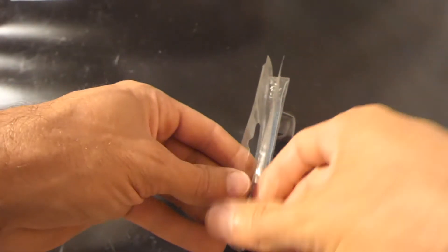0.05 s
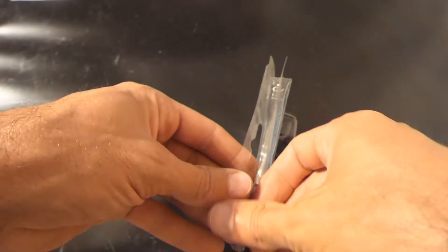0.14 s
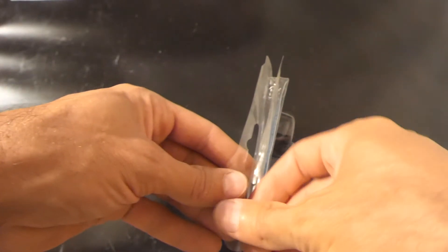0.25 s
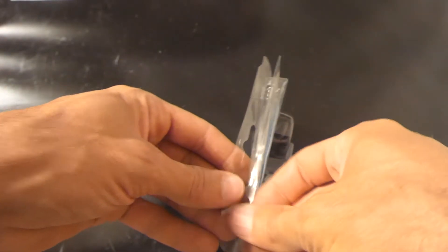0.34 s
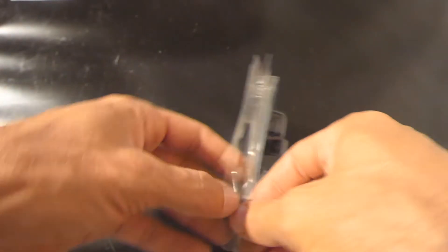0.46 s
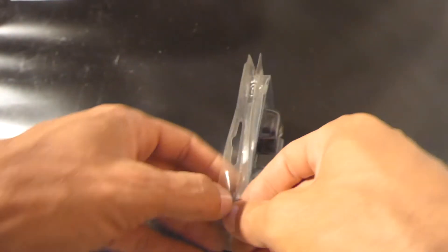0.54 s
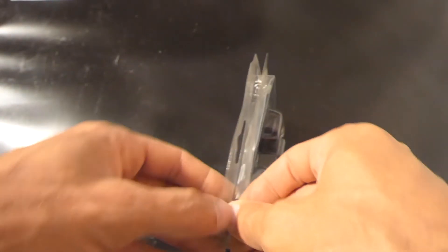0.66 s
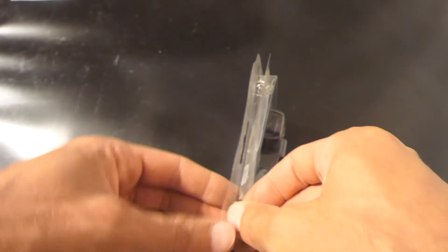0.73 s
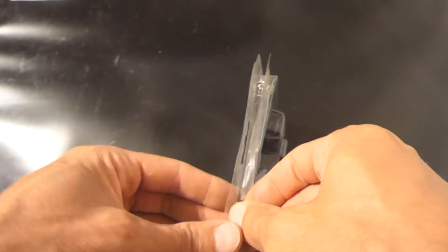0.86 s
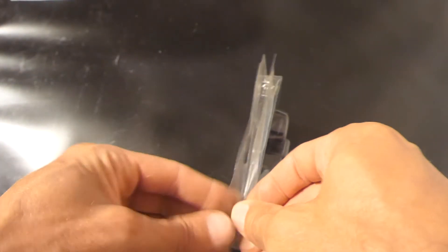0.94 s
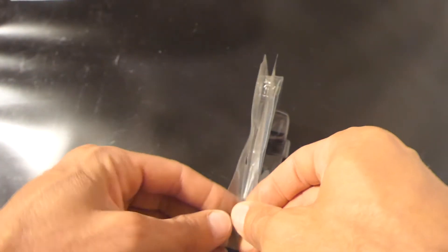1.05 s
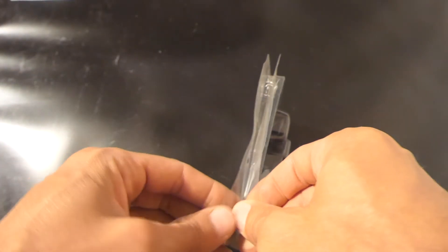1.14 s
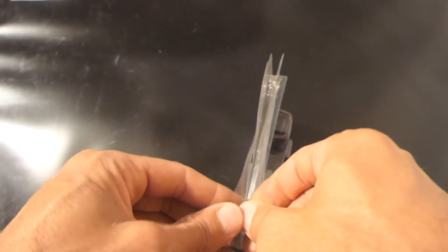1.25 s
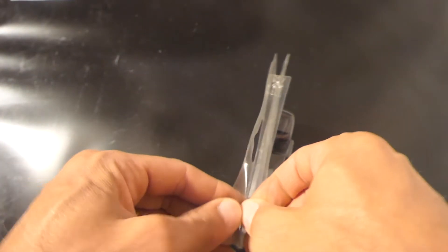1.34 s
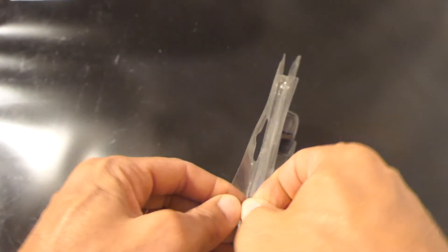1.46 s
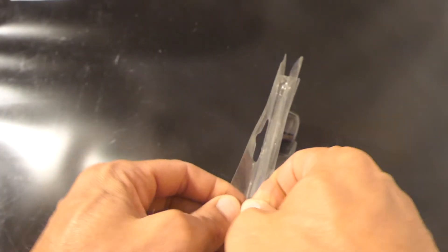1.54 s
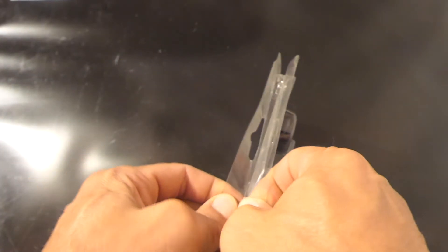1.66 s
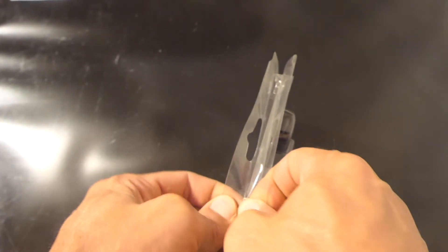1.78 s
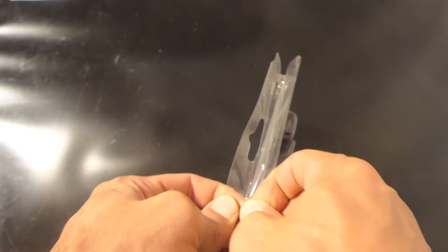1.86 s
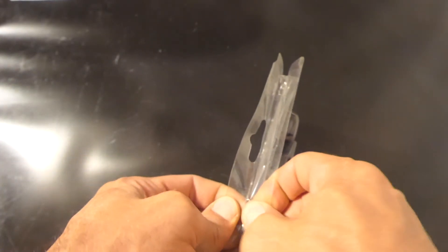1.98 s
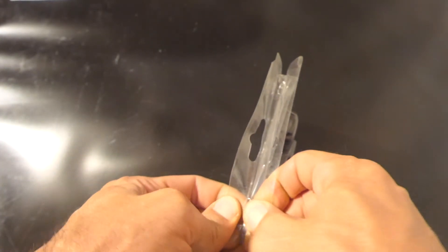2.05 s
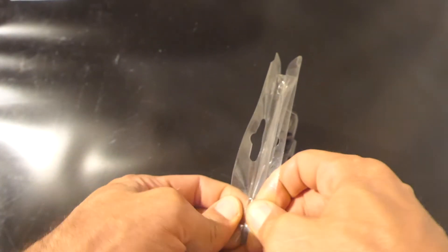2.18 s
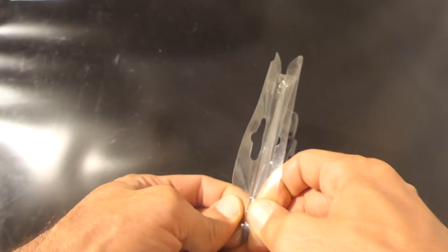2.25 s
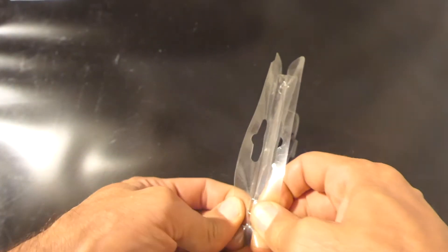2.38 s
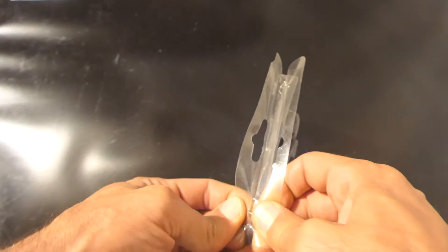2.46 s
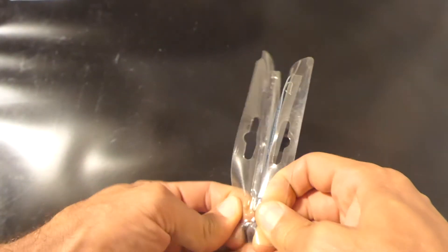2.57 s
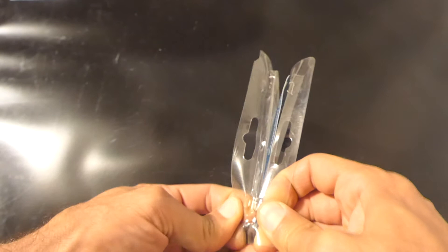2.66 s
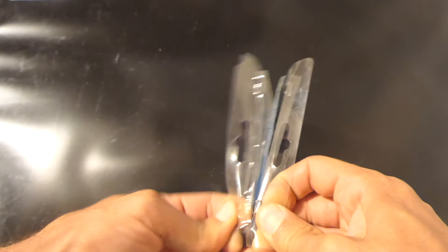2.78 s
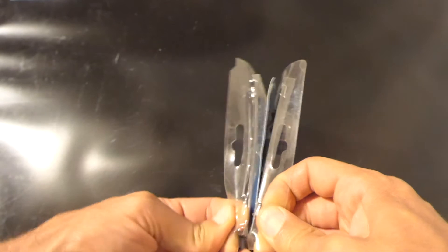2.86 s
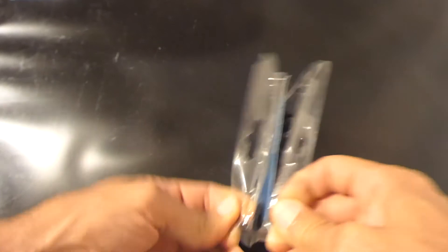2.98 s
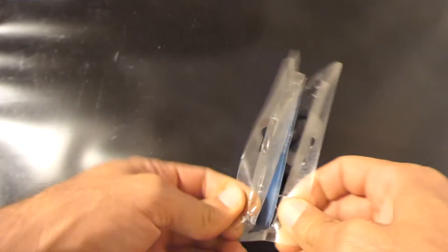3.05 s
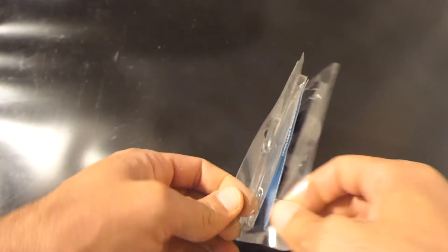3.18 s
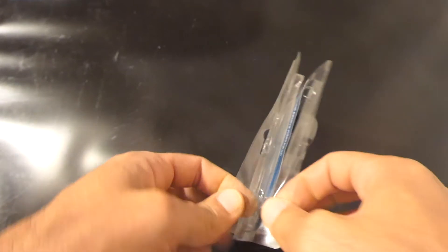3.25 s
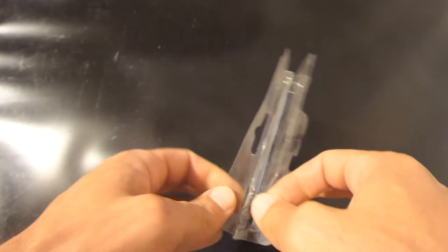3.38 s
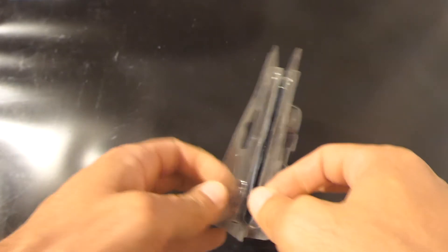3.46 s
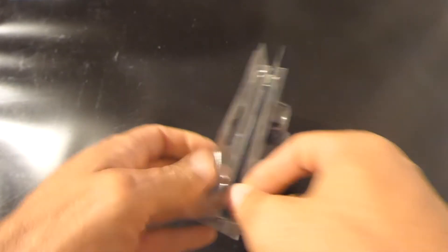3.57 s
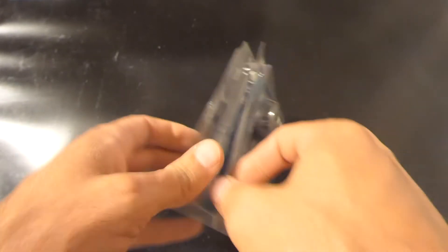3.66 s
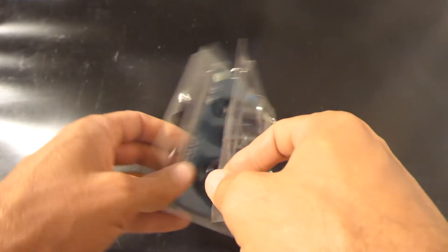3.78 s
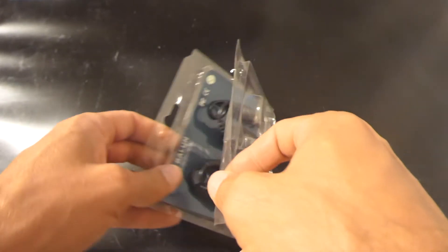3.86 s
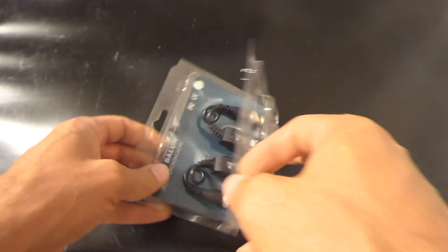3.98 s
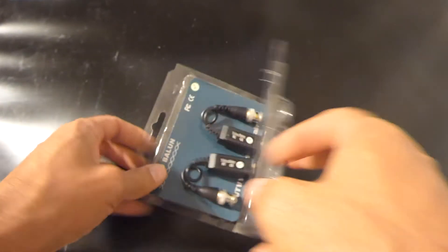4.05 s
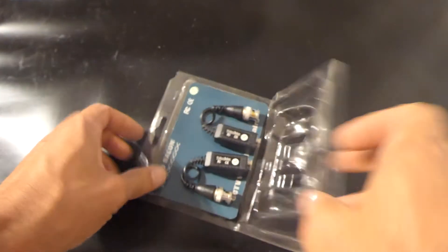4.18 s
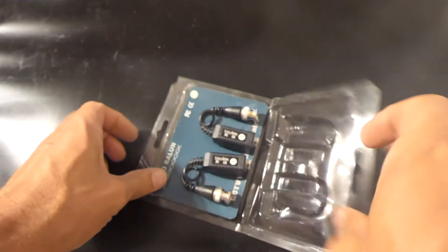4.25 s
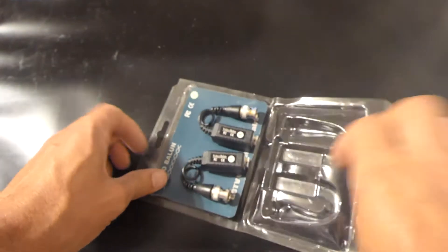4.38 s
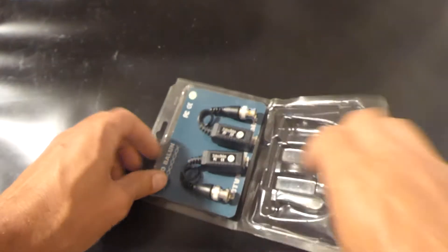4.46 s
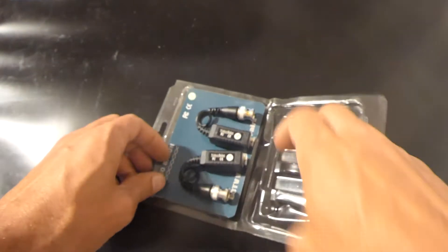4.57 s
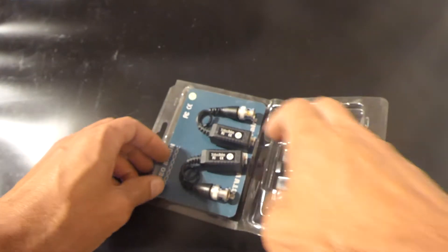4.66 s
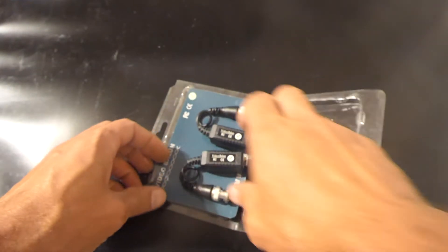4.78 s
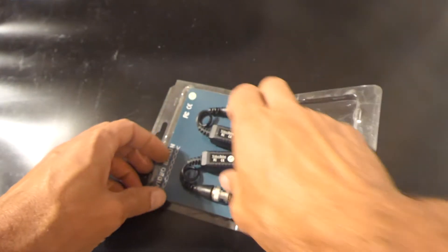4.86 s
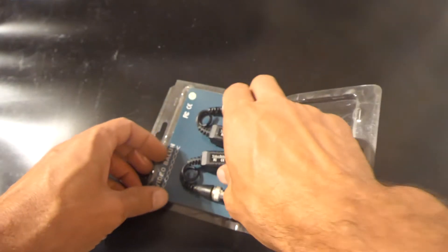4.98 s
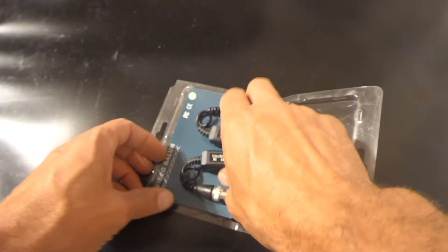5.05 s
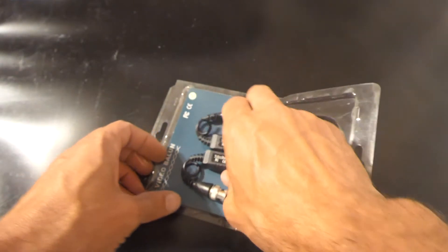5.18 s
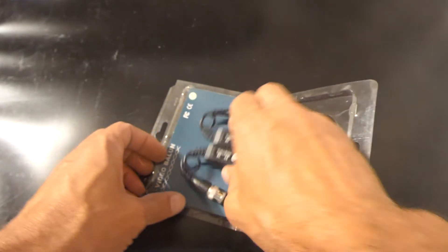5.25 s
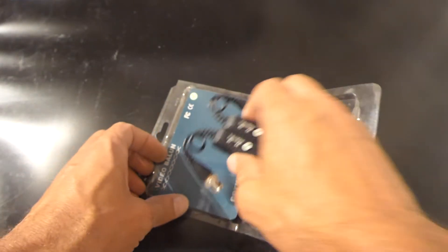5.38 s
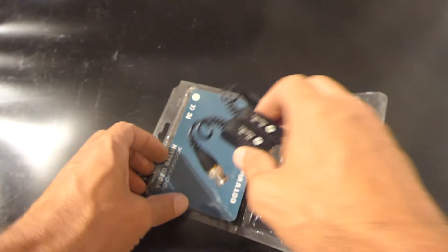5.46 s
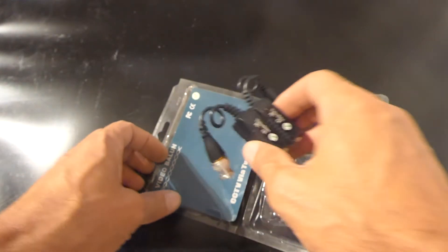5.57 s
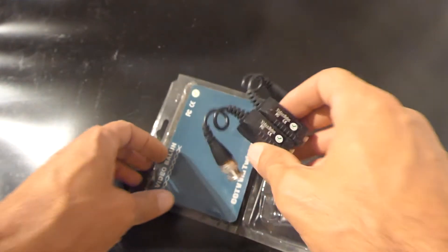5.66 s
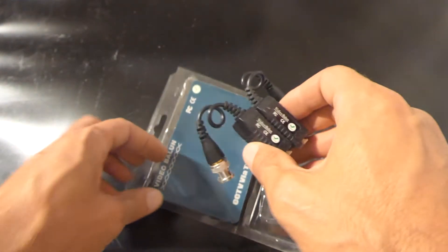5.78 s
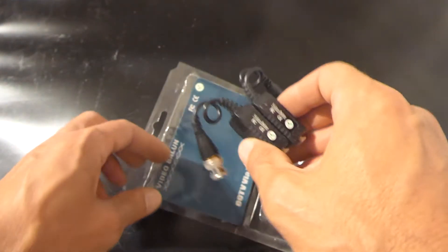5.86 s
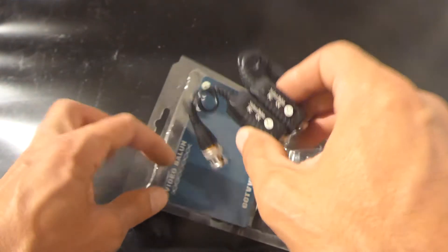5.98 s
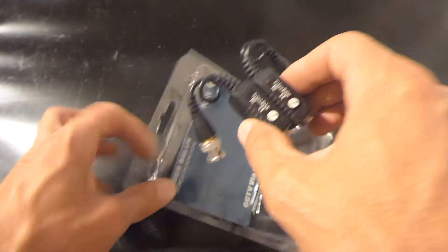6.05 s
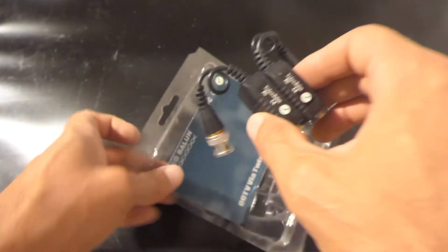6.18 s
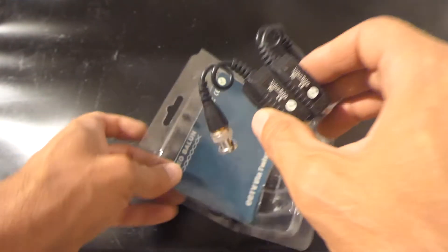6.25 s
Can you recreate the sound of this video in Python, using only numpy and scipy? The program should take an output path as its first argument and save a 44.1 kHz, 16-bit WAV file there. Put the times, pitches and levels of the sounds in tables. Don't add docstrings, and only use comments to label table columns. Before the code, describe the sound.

Fingers fumble and pick at a stiff plastic blister pack, then sharp weld snaps burst out, the lid buckles open, and parts click loose.

```python
import sys
import numpy as np
from scipy import signal
from scipy.fft import rfft, irfft, next_fast_len
from scipy.io import wavfile
from scipy.ndimage import uniform_filter1d, map_coordinates

SR = 44100
rng = np.random.default_rng(int(sys.argv[2]) if len(sys.argv) > 2 else 0)


def decibels_to_gain(level_db):
    exponent = np.asarray(level_db, float) / 20
    return 10 ** exponent


def log_audio(samples):
    frames = np.atleast_2d(samples).T
    limited = np.clip(frames, -1, 1)
    pcm = np.round(limited * 32767).astype(np.int16)
    wavfile.write(sys.argv[1], SR, pcm)


N = 278712

# time_s, left_minus_right_db
PACK_PAN = [(0, -2), (1.9, -3), (3.45, -2.5), (3.7, -0.6), (5.4, -1.8), (6.32, -0.5)]
# freq_hz, level_db
SKIN_COLOUR = [(880, -22.5), (1500, -2.5), (2600, -9), (2820, -6), (3060, -8), (3310, -9), (3550, -6.5),
               (10200, -11), (14900, -28), (16500, -52.5)]
# freq_hz, width_hz, level_db
TABLE_MODES = [(86.3, 72, -8), (149, 12, 1), (178.2, 18.8, 1), (234.7, 73, -1), (380, 45.6, -1.5),
               (676, 56, -5.5)]
# freq_hz, level_db
EDGE_FIZZ = [(5000, 8.5), (6800, -4.5), (9500, -1), (12000, -14.5), (15000, -36), (17000, -31.5)]
# delay_s, level_db
REFLECTIONS = [(.0035, -9.5), (.0056, -27.5), (.0095, -22), (0.0116, -20.5), (0.027, -26)]
# freq_hz, t60_s
ROOM_DECAY = [(150, 0.28), (400, 0.29), (1000, 0.28), (2800, 0.22), (7000, 0.27), (14000, 0.2)]
# freq_hz, level_db
ROOM_TONE = [(15, -32.5), (25, -11), (87, -13), (238, -4), (470, -5.5), (600, -4), (1090, -4), (1250, -4),
             (2040, -17.5), (8140, -27.5), (10100, -18.5), (15400, -28), (16500, -48)]
# freq_hz, likeness
EAR_LIKENESS = [(60, -2), (180, -5), (550, 0.37), (1650, 0.6), (4970, 0.74), (15000, 1)]
# freq_hz, width_hz, level_db
SHUT_SHELL = [(778, 69, 3), (1208, 187, -0.5), (1588, 1550, -10.5), (2250, 153, -3), (2900, 1500, -20.5)]
# freq_hz, width_hz, level_db
OPEN_SHELL = [(823, 145, -4.5), (1250, 370, -6.5), (1640, 250, -3), (2200, 200, -6.5), (2790, 560, -11)]
# freq_hz, level_db
MIC_COLOUR = [(27, -10.5), (58, -3), (150, -3), (4500, -1.5), (6600, 0), (9500, -2.5), (13000, 0.5),
              (15000, -2.5), (16500, -20)]
# start_s, peak_db, crack_hz, drum_db, knock_db
SHELL_SHOVES = [(0.041, -42.5, 3200, -8, -8.5), (0.3288, -59, 2200, 8, -13), (1.1431, -40, 2200, 2.5, -1.5),
                (1.677, -56, 2470, 1, 2.5), (3.3344, -40, 2490, 0, -1), (3.7446, -36, 2230, -20, -16),
                (3.825, -32.5, 2400, -10, -39), (3.9058, -36, 3130, 2.5, -10),
                (4.1975, -26.5, 4230, -4, -15.5), (4.2034, -28, 2270, 0, -16), (4.543, -37.5, 4900, 1, 0),
                (4.5604, -33.5, 4000, 2.5, -10), (4.601, -32.5, 3570, -1.5, -10.5),
                (5.484, -63.5, 3650, 4, -25.5), (5.673, -62, 2350, 10, -22), (5.9632, -38.5, 2440, 0, -42),
                (5.976, -30.5, 4900, -0.5, -42), (6.01, -36.5, 3250, 0, -38), (6.102, -36, 4500, -10, -19)]
# start_s, end_s, slips_per_s, peak_db, pitch_hz
SEAM_CREAK = (1.34, 1.7, 60, -56, 5100)
# start_s, peak_db, crack_hz, fizz_db, drum_db
SEAM_PICKS = [(.0946, -47.5, 3520, -5, -8), (.1422, -48, 2170, 0, -9), (.3115, -53, 2260, 5, -4),
              (.5935, -56, 2260, 5, 2.5), (.6908, -57.5, 5700, -9, 1), (1.063, -45.5, 2250, 3, -6.5),
              (1.1315, -54, 5000, 9, -9), (1.361, -47.5, 5340, -6.5, -5), (1.7886, -55, 2260, 5, 3.5),
              (2.085, -47.5, 2400, -5, -2), (1.941, -44.5, 2900, -46, -2), (1.9733, -20.5, 2840, -13, -15),
              (1.9768, -23.5, 2360, -11, -9.5), (2.164, -40.5, 4400, -28, -4),
              (2.231, -41.5, 4300, -16, -2.5), (2.2758, -33.5, 5160, -3, -16)]
# start_s, peak_db, crack_hz, fizz_db, drum_db
WELD_SNAPS = [(2.5478, -38, 5740, -12, -12), (2.5577, -15, 4500, -5, -18), (2.5584, -11, 3000, -33.5, -16),
              (2.5584, -20, 7900, -15, -10), (2.7463, -25, 2250, -13, -10), (2.7655, -22.5, 3100, -14, -31),
              (2.8625, -35.5, 8200, -4, -22), (2.8735, -32, 3700, -20, -12), (2.9283, -32, 4400, -10, -15),
              (3.033, -23.5, 3120, -10.5, -15), (3.0483, -1.5, 3930, -29, -30),
              (3.0488, -8.5, 2180, -36.5, -41), (3.1443, -30.5, 2210, -31, -16),
              (3.174, -36, 2200, -14, -7.5), (3.213, -18, 3900, -14.5, -24.5),
              (3.2883, -30, 3120, -13, -12.5), (3.4036, -23.5, 4000, -14, -18.5),
              (3.5271, -37, 2250, -13, -10), (3.575, -34.5, 2350, -26, -10.5)]
# start_s, peak_db, crack_hz, fizz_db, drum_db
LID_BUCKLES = [(3.7635, -38, 2400, 1, -19), (3.8285, -34.5, 4220, 6, -12), (3.8419, -41, 3050, 2, -7),
               (4.3367, -27, 4900, -11, -10), (4.5007, -31.5, 3860, -7, -9),
               (4.9769, -55.5, 2260, -38.5, 9.5), (5.0442, -55, 2200, -8, 3.5),
               (5.116, -29, 3250, -7.5, -6.5), (5.1614, -34.5, 2190, 10, -2), (5.1614, -24, 3680, -7, -33),
               (6.0259, -28, 3300, -28, -15), (6.0562, -35.5, 4900, -13, -6), (6.219, -38, 2280, -13, -3),
               (6.232, -36.5, 2330, -16, 5), (6.2358, -18.5, 4900, -8.5, -15),
               (6.2378, -19.5, 3200, -21, -8.5), (6.25, -31, 3000, -2, -4)]
# start_s, peak_db, crack_hz, fizz_db, drum_db
FOLD_TICKS = [
    (4.5628, -30.5, 3700, -5, -20),
    (4.5445, -37, 3900, -14, -20),
    (4.2, -37, 4200, -10, -13),
    (4.6605, -52, 6000, 2, -18),
]
# start_s, peak_db, crack_hz, drum_db, knock_db
EDGE_TAPS = [(0.353, -45, 5000, -12, -24), (2.5587, -32.5, 4300, -21, 1), (3.3235, -38, 2480, -12, -9),
             (3.7215, -33.5, 4100, -11, -18), (3.77, -37, 2790, -14, -18), (3.8145, -25, 2670, -4, -14),
             (4.3055, -54, 2250, 13, 3.5), (4.4866, -50, 2250, 13, 4.5), (4.659, -48, 2440, 7, -3),
             (6.1228, -38, 4800, -12, -6), (6.2355, -36.5, 4800, -14, -2)]
# peak_s, rub_db, drum_db, swell_s, fade_s
SHUT_STROKES = [(.06, -59.5, -52.5, 0.15, 0.086), (.16, -62, -61, .1, 0.08),
                (.35, -57, -56.5, 0.059, 0.085), (.47, -60, -64, 0.19, 0.13), (.61, -56, -55.5, 0.051, 0.1),
                (.74, -55, -62, 0.06, 0.066), (.98, -54, -65, 0.051, 0.054), (1.08, -53, -58, 0.017, 0.019),
                (1.33, -64, -54.5, 0.057, 0.033), (1.47, -70.5, -58.5, 0.21, 0.54),
                (1.69, -64.5, -50.5, 0.068, 0.14), (1.81, -63, -56, 0.063, 0.055),
                (2.17, -64.5, -52, 0.27, 0.11), (3.02, -49, -48.5, 0.38, 0.22),
                (3.33, -52, -47, 0.13, 0.13), (3.58, -53, -53.5, 0.1, 0.055)]
# peak_s, rub_db, drum_db, swell_s, fade_s
OPEN_STROKES = [(3.759, -45, -41.5, 0.061, 0.27), (3.87, -63, -67, .1, 0.17),
                (4.17, -50, -52.5, 0.51, 0.28), (4.36, -67, -49.5, 0.16, 0.16),
                (4.511, -46, -40.5, 0.05, 0.12), (4.57, -42.5, -52, 0.062, .14),
                (4.75, -58.5, -52, 0.19, 0.28), (5.401, -53.5, -51, 0.34, 0.23),
                (5.49, -72, -50, 0.12, 0.068), (5.67, -60, -57, 0.16, 0.3), (5.8, -57, -51, 0.2, 0.36),
                (5.98, -42.5, -45.5, 0.096, 0.1), (6.11, -47, -42.5, 0.081, 0.076),
                (6.18, -63, -46, 0.15, 0.45)]
# peak_s, rub_db, drum_db, fade_s
SHEET_SETTLING = [(1.155, -54, -45, 0.12), (2.002, -47.5, -61, 0.062), (2.29, -59, -49.5, 0.1),
                  (2.592, -37.5, -44.5, 0.094), (2.768, -48, -51, 0.15), (3.099, -46.5, -52, 0.1),
                  (3.419, -54, -54, 0.13), (4.217, -36.5, -28.5, 0.043), (5.13, -49, -60.5, 0.067),
                  (5.18, -47.5, -63, 0.078), (6.249, -42, -46, 0.065)]
# peak_s, rumble_db, swell_s, fade_s
TABLE_DRAGS = [(.05, -55, 0.084, 0.15), (.35, -58.5, 0.049, 0.24), (1.18, -45, 0.044, 0.08),
               (1.34, -57.5, 0.12, .25), (1.71, -58, 0.41, 0.17), (1.99, -63, .1, 0.64),
               (2.6, -36, 0.048, 0.053), (2.65, -54.5, .05, 0.44), (3.03, -47.5, 0.38, 0.15),
               (3.17, -52, 0.14, 0.13), (3.34, -51, 0.13, 0.036), (3.59, -57.5, 0.28, 0.08),
               (3.73, -56, 0.042, .09), (3.82, -52, 0.045, 0.09), (3.91, -48, .04, 0.094),
               (4.29, -49.5, 0.3, 0.17), (4.58, -49.5, 0.16, 0.35), (5.17, -59, 0.23, 0.98),
               (6.13, -55, 0.32, 0.34), (6.25, -43.5, 0.064, 0.12)]
# start_s, peak_db
HUM_KNOCKS = [
    (.33, -58.5),
    (1.143, -53),
    (1.329, -68),
    (4.487, -50.5),
]
# start_s, peak_db, pitch_hz, t60_s
SHUT_POPS = [(.043, -41.5, 767, 0.1), (.1425, -51, 2200, 0.033), (.312, -54, 2200, 0.033),
             (.327, -50, 853, 0.047), (.335, -52, 402.4, 0.19), (2.017, -42, 2780, .02),
             (3.2162, -26, 3900, .008), (2.9315, -34, 4500, .008), (2.425, -55, 4030, .004),
             (2.515, -57.5, 3200, .006), (2.5585, -21.5, 1186, 0.014), (2.5625, -12.5, 4560, 0.01),
             (2.564, -20.5, 2245, 0.017), (2.572, -17, 10800, .004), (2.5722, -22, 7800, .004),
             (2.5915, -27, 4240, .02), (2.6145, -33, 4220, 0.025), (2.7497, -32, 2280, .025),
             (2.874, -41, 3710, 0.083), (2.971, -38.5, 2300, 0.02), (3.172, -31.5, 1670, 0.024),
             (3.146, -45, 1390, .02), (3.05, -25.5, 1600, .025), (.596, -57, 823, .12),
             (3.05, -30.5, 1280, 0.036), (1.066, -50, 2200, .02), (1.067, -58, 910, .06),
             (1.133, -49, 6400, .025), (1.139, -44, 2200, .03), (1.1455, -37, 817, 0.053),
             (1.153, -39, 2110, 0.023), (1.999, -40, 3030, .03), (3.0328, -31, 6700, .006),
             (3.053, -23, 1896, 0.026), (3.064, -31, 5000, 0.018), (2.5581, -10, 4370, .012),
             (2.5577, -12, 9300, .009), (2.5577, -18, 11500, .006), (3.0484, -21, 5700, .006),
             (3.0516, -32, 9700, .008), (3.0365, -29, 2700, .01), (1.15, -48, 300, 0.22),
             (1.33, -60, 298, .2)]
# start_s, peak_db, pitch_hz, t60_s
OPEN_POPS = [(3.717, -48.5, 796, .08), (3.724, -45, 353, 0.15), (3.741, -38, 1640, 0.025),
             (3.749, -33.5, 1640, 0.03), (3.762, -36, 2030, 0.026), (3.772, -36, 1600, .025),
             (3.8148, -18.5, 1480, 0.005), (3.815, -32, 2820, .01), (3.8253, -24, 1640, 0.026),
             (3.844, -42, 1600, 0.034), (3.861, -45, 1630, 0.028), (3.901, -44, 1740, 0.019),
             (3.9058, -27.5, 1600, 0.03), (3.908, -34.5, 3280, .02), (3.91, -41, 282, 0.041),
             (4.634, -41, 1600, 0.025), (4.491, -49.5, 110, .2), (4.501, -34, 1657, 0.045),
             (4.513, -38, 1760, 0.028), (4.522, -41, 1630, 0.027), (4.536, -42, 1600, .02),
             (4.5463, -34, 1640, .018), (4.5538, -32, 1940, .02), (4.5634, -23.5, 1750, 0.009),
             (4.5728, -36, 1770, .03), (4.587, -34, 1920, 0.014), (4.605, -27.5, 1350, 0.021),
             (4.611, -32.5, 1980, .02), (4.6589, -36.5, 1650, 0.018), (5.1137, -37, 3500, .006),
             (5.1162, -39, 1115, .015), (5.1609, -31, 980, 0.014), (5.162, -32.5, 1980, 0.011),
             (4.1964, -26, 1780, 0.018), (4.2, -24, 1250, .02), (4.203, -23.5, 1354, 0.022),
             (4.2066, -24, 2030, .012), (4.213, -27, 2310, .03), (4.228, -30, 1600, 0.017),
             (4.2002, -23, 3200, .008), (4.2003, -27, 5000, .006), (4.3054, -37.5, 1100, 0.01),
             (3.9117, -28.5, 1640, 0.026)]
# start_s, peak_db, pitch_hz, t60_s
TRAY_POPS = [(5.3226, -50, 2000, .03), (5.329, -55, 1420, 0.056), (5.3694, -48, 1476, .07),
             (5.405, -52, 3270, .05), (5.447, -47, 1660, .025), (5.484, -44.5, 1557, 0.051),
             (5.6428, -50, 1670, 0.057), (5.6736, -42.5, 1620, .04), (5.7072, -49, 1600, .05),
             (5.7403, -47, 1620, .05), (5.7, -57, 2790, .3), (5.785, -54, 2770, .08),
             (5.775, -48, 1620, .15), (5.826, -45, 1440, 0.022), (5.875, -51, 2400, 0.19),
             (5.89, -49, 1600, .05), (5.92, -50, 2780, .08), (5.949, -63, 110, .2), (6.08, -52, 130, .2),
             (6.241, -54, 99, 0.16), (5.9776, -26.5, 5380, 0.007), (6.013, -35, 1570, 0.032),
             (6.109, -37, 1400, 0.017), (6.126, -41, 4970, 0.014), (6.242, -27, 1554, 0.016),
             (6.2883, -40, 3150, 0.018), (6.2972, -41, 3150, .025), (6.29, -44, 1600, 0.014),
             (6.2358, -18, 4950, .016), (6.237, -21, 3130, 0.017), (6.2377, -24.5, 6300, .012)]

LOOSE_S, OPENS_S = 1.9, 3.65
ROOM_TONE_DB = -64
REST_RUB_DB, REST_DRUM_DB, REST_RUMBLE_DB = -81, -69.5, -69.5
BRIGHT_DB, DULL_DB = 2.5, -2
SETTLE_SWELL_S = 0.041
SHOVE_RISE_S, SHOVE_FIZZ_DB, TAP_FIZZ_DB = 0.00319, -11.5, -7
KNOCK_DB, KNOCK_SLOPE = -51, -0.041
POP_RISE_CYCLES, POP_ROUGH, POP_ROOM_DB, POP_SPREAD_S = 1.46, 0.46, -10, 0.0074
HUM_HZ, HUM_T60_S = 140.2, 0.64


def unit(x):
    return x / np.sqrt(np.mean(x ** 2) + 1e-20)


def along(points, hz):
    f, v = np.transpose(points)
    return np.interp(np.log(hz + 1), np.log(f + 1), v)


def pack_pan():
    s, balance_db = np.transpose(PACK_PAN)
    pan_db = np.interp(np.arange(N) / SR, s, balance_db)
    return decibels_to_gain(pan_db * np.array([[.5], [-.5]]))


def wobble(rate):
    knots = rng.standard_normal(int(N * rate / SR) + 4)
    return map_coordinates(knots, [np.arange(N) * rate / SR])


def filtered(x, response):
    n = x.shape[-1]
    m = next_fast_len(n + 4096)
    return irfft(rfft(x, m) * response(np.fft.rfftfreq(m, 1 / SR)), m)[..., :n]


def modes(table):
    def response(f):
        total = 0
        for k, (centre, width, db) in enumerate(table):
            damping = 1j * f * width
            total = total + (-1) ** k * decibels_to_gain(db) * damping / (centre * centre - f * f + damping)
        return total

    return response


def ear_likeness(hz):
    return along(EAR_LIKENESS, hz)


def stereo_noise(colour, alike, patchy_db):
    z = signal.stft(rng.standard_normal((2, N)), nperseg=512)[2]
    field = uniform_filter1d(rng.standard_normal(z.shape[1:]), size=3, axis=0)
    field = uniform_filter1d(field, size=9, axis=1)
    noise = signal.istft(z * decibels_to_gain(patchy_db * unit(field)), nperseg=512)[1][:, :N]

    def mid_side(hz):
        turn = np.arccos(np.clip(alike(hz), -1, 1)) / 2
        return colour(hz) * np.array([np.cos(turn), np.sin(turn)])

    mid, side = filtered(noise, mid_side)
    return unit(np.array([mid + side, mid - side]))


def room_tail():
    n = SR // 4
    hz, t, z = signal.stft(rng.standard_normal((2, n)), SR, nperseg=256)
    decay = decibels_to_gain(-60 * t / along(ROOM_DECAY, hz)[:, None])
    tail = signal.istft(z * decay, SR, nperseg=256)[1][:, :n]
    tail = tail * (1 - np.exp(-np.arange(n) / SR / 0.001))
    mid, side = tail / np.linalg.norm(tail[0])
    return np.array([mid + 0.5 * side, mid - 0.45 * side])


def room_tone():
    colour = lambda hz: decibels_to_gain(along(ROOM_TONE, hz))
    return decibels_to_gain(ROOM_TONE_DB - 0.5) * stereo_noise(colour, lambda hz: 0.063 + 0 * hz, patchy_db=2.5)


def strokes(rows, rest_db):
    t, power = np.arange(N) / SR, decibels_to_gain(2 * rest_db)
    for s, db, swell, fade in rows:
        drop_db = 20 * np.maximum((s - t) / swell, (t - s) / fade)
        power = power + decibels_to_gain(2 * (db - drop_db))
    return np.sqrt(power)


def micro_slips(rate, spread_db):
    size = np.minimum(rng.exponential(size=N), 3)
    return (rng.random(N) < rate / SR) * rng.choice([-1, 1], N) * decibels_to_gain(spread_db * size)


def rubbing(tilt_db):
    skin = lambda hz: decibels_to_gain(along(SKIN_COLOUR, hz) + tilt_db * np.log2((hz + 1) / 5000))
    slips = unit(filtered(micro_slips(640, 5), skin))
    grip = decibels_to_gain(1.9 * wobble(70))
    return unit(grip * stereo_noise(skin, ear_likeness, patchy_db=2.0) + 0.45 * slips)


def drumming(shell):
    lumps = unit(filtered(micro_slips(350, 4.8), modes(shell)))
    press = decibels_to_gain(2.5 * wobble(45))
    return unit(press * stereo_noise(modes(shell), ear_likeness, patchy_db=4.5) + 0.78 * lumps)


def dragging():
    table = lambda hz: modes(TABLE_MODES)(hz) * modes([(260, 600, 0)])(hz)
    rumble = stereo_noise(table, lambda hz: .65 + 0 * hz, patchy_db=3)
    return decibels_to_gain(-4.0) * strokes(TABLE_DRAGS, REST_RUMBLE_DB) * rumble


def hands():
    settling = [(s, rub, drum, SETTLE_SWELL_S, fade) for s, rub, drum, fade in SHEET_SETTLING]
    moves = [*SHUT_STROKES, *OPEN_STROKES, *settling]
    sliding = strokes([(s, rub, *shape) for s, rub, drum, *shape in moves], REST_RUB_DB)
    bending = strokes([(s, drum, *shape) for s, rub, drum, *shape in moves], REST_DRUM_DB)
    t = np.arange(N)
    rub = np.where(t < LOOSE_S * SR, rubbing(BRIGHT_DB), rubbing(DULL_DB))
    drum = np.where(t < OPENS_S * SR, drumming(SHUT_SHELL), drumming(OPEN_SHELL))
    touch = decibels_to_gain(3.0) * sliding * rub + decibels_to_gain(-3.5) * bending * drum
    return pack_pan() * touch + dragging()


def snap(s, rise, hz, fizz_db, drum_db, knock_db):
    t = np.arange(SR // 8) / SR

    def ring(t60, rough, *bodies):
        jolt = np.double(t == 0)
        fractures = rng.standard_normal(len(t)) * decibels_to_gain(-60 * t / (t60 + 6 * rise))
        if rise:
            direct = fractures * (t / rise).clip(0, 1) ** 2
        else:
            direct = jolt + rough * fractures
        both = np.array([direct, jolt])
        for body in bodies:
            both = filtered(both, body)
        both[1] *= np.linalg.norm(both[0]) / np.linalg.norm(both[1])
        return both / np.max(np.abs(both[0]))

    fold = [(.66 * hz, .25 * hz, -13), (hz, .22 * hz, 0), (1.38 * hz, .4 * hz, -8)]
    crack = ring(0.013, 0.12, modes(fold), modes([(hz, 3.7 * hz, 0)]), modes([(hz, 5.0 * hz, 0)]))
    flaps = [(hz * decibels_to_gain(db), 90, 0) for db in np.sort([0, *rng.normal(0, 2.5, 3)])]
    crack += decibels_to_gain(-17) * ring(.003, 0.15, modes(flaps), modes([(hz, 1.2 * hz, 0)]))
    fizz = ring(0.0065, 0.71, modes([(10100, 5500, 0)]), lambda f: decibels_to_gain(along(EDGE_FIZZ, f)))
    shell = SHUT_SHELL if s < OPENS_S else OPEN_SHELL
    shell = [(c * decibels_to_gain(rng.normal(0, 0.44)), w, db + rng.normal(0, 1.9)) for c, w, db in shell]
    drum = ring(0.012, 1.0, modes(shell), modes([(1600, 1500, 0)]))
    knock = ring(0.075, 0.38, modes(TABLE_MODES), modes([(290, 390, 0)]), modes([(299, 1100, 0)]))
    sheet = crack + decibels_to_gain(fizz_db + 10.0) * fizz
    return sheet + decibels_to_gain(drum_db + 4.5) * drum + decibels_to_gain(knock_db - 0.4) * knock


def snap_rows():
    rows = []
    for row in [*SEAM_PICKS, *WELD_SNAPS, *LID_BUCKLES]:
        rows.append((0, *row, KNOCK_DB + KNOCK_SLOPE * row[1]))
    rows += [(0, *row) for row in creak()]
    rows += [(0, s, db, hz, TAP_FIZZ_DB, *body) for s, db, hz, *body in EDGE_TAPS]
    rows += [(SHOVE_RISE_S, s, db, hz, SHOVE_FIZZ_DB, *body) for s, db, hz, *body in SHELL_SHOVES]
    rows += [(0, *row, KNOCK_DB) for row in FOLD_TICKS]
    return rows


def snaps():
    out, pan = np.zeros((2, N + SR)), pack_pan()
    for rise, s, db, *colour in snap_rows():
        at = round((s - 0.3627 * rise) * SR)
        direct, diffuse = snap(s, rise, *colour)
        path = np.zeros((2, SR // 4))
        path[:, 0] = pan[:, at]
        for delay, echo_db in REFLECTIONS:
            tap = round(delay * SR) + rng.integers(0, 12)
            path[:, tap] += decibels_to_gain(echo_db + rng.normal(0, 1.4) + rng.normal(0, 2.0, 2))
        heard = signal.fftconvolve(direct[None], path, axes=1)
        heard += decibels_to_gain(-5.0) * signal.fftconvolve(diffuse[None], room_tail(), axes=1)
        out[:, at:at + heard.shape[1]] += decibels_to_gain(db) * heard
    return out[:, :N]


def pops():
    out, pan = np.zeros((2, N + SR)), pack_pan()
    t = np.arange(SR // 5) / SR
    for s, db, hz, t60 in [*SHUT_POPS, *OPEN_POPS, *TRAY_POPS]:
        at = round(s * SR)
        flutter = unit(uniform_filter1d(rng.standard_normal(len(t)), size=int(2 * SR / hz)))
        envelope = decibels_to_gain(-60 * t / t60) * (1 - np.exp(-t * hz / POP_RISE_CYCLES))
        note = np.sin(2 * np.pi * hz * t + POP_ROUGH * flutter) * envelope
        note = filtered(note, modes([(hz, 2 * hz, 0)]))
        note = note / np.max(np.abs(note))
        spread = note * decibels_to_gain(-60 * t / POP_SPREAD_S)
        spread *= np.linalg.norm(note) / np.linalg.norm(spread)
        heard = decibels_to_gain(POP_ROOM_DB) * signal.fftconvolve(spread[None], room_tail(), axes=1)
        heard[:, :len(t)] += note * pan[:, at, None]
        out[:, at:at + heard.shape[1]] += decibels_to_gain(db) * heard
    return out[:, :N]


def hum():
    s, peak_db = np.transpose(HUM_KNOCKS)
    t = np.arange(N) / SR - s[:, None]
    ring = (t > 0) * np.sin(2 * np.pi * HUM_HZ * t) * decibels_to_gain(-60 * abs(t) / HUM_T60_S)
    return decibels_to_gain(peak_db) @ ring


def creak():
    start, end, rate, db, hz = SEAM_CREAK
    rows = []
    for s in np.arange(start, end, 1 / rate):
        late, louder, higher = rng.standard_normal(3)
        rows.append((s + 0.0098 * late, db + 3.4 * louder, hz * decibels_to_gain(higher), -14, -14, -40))
    return rows


def scene():
    return room_tone() + hands() + snaps() + pops() + hum()


def roll_off(x):
    return signal.sosfilt(signal.butter(12, 16640, fs=SR, output="sos"), x)


def record(dry):
    mic = lambda hz: decibels_to_gain(along(MIC_COLOUR, hz)) * (hz < 16600)
    return roll_off(filtered(dry, mic))


dry = scene()
out = record(dry)
log_audio(out)
```